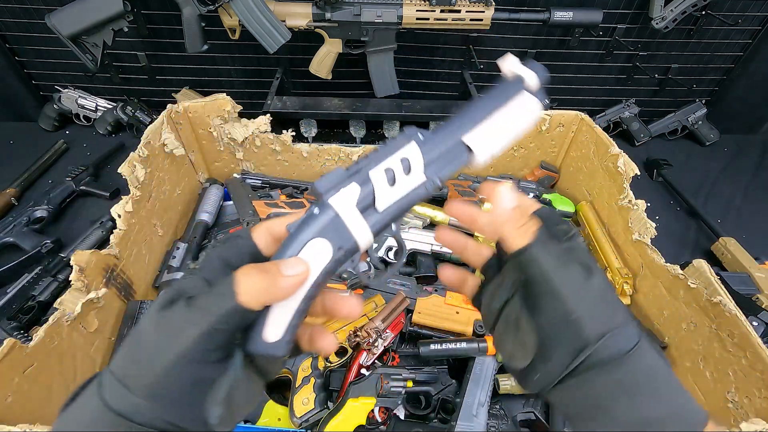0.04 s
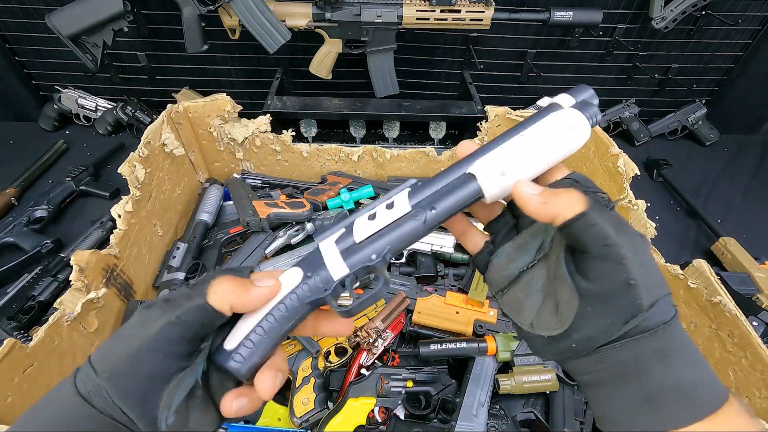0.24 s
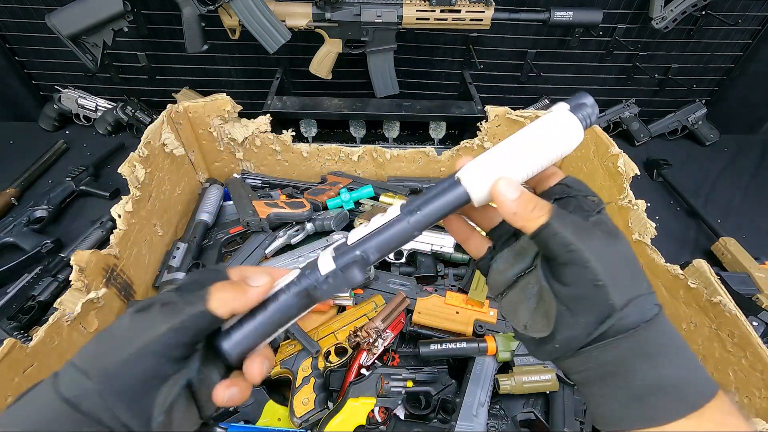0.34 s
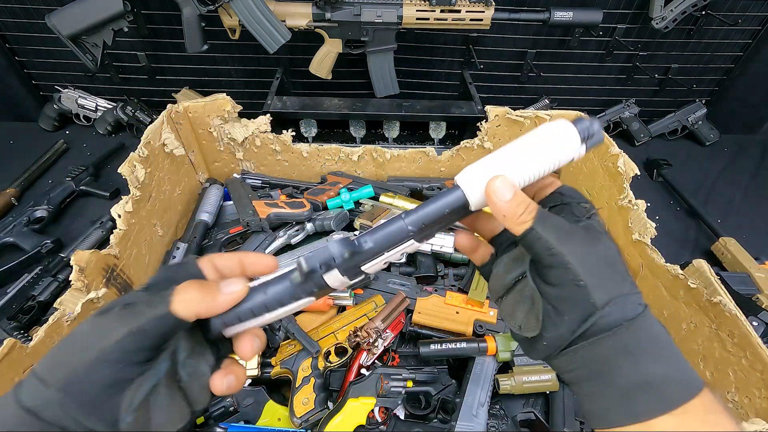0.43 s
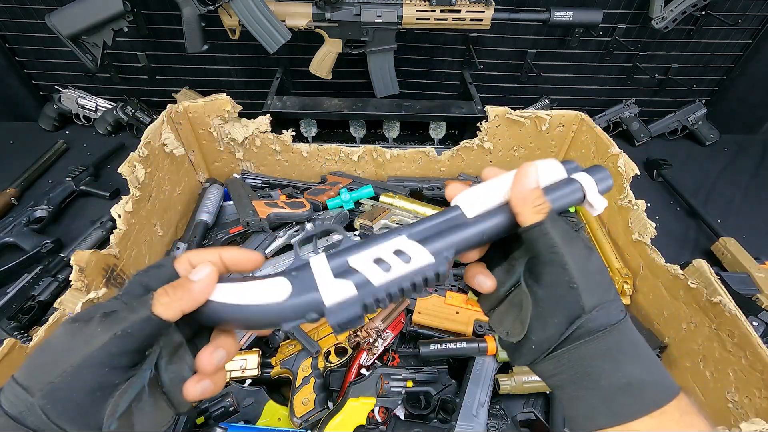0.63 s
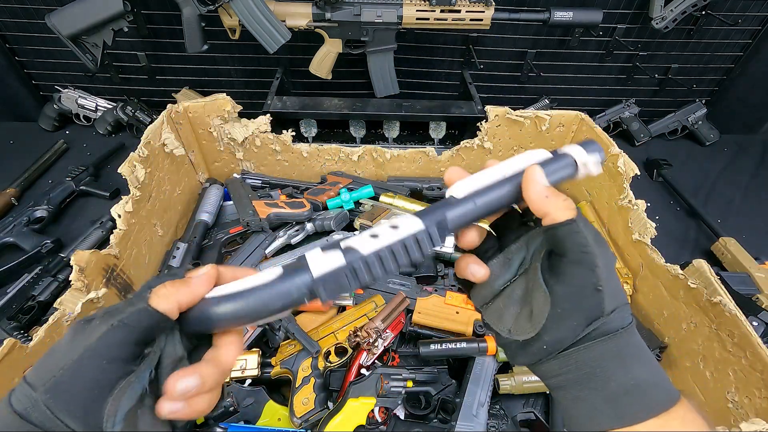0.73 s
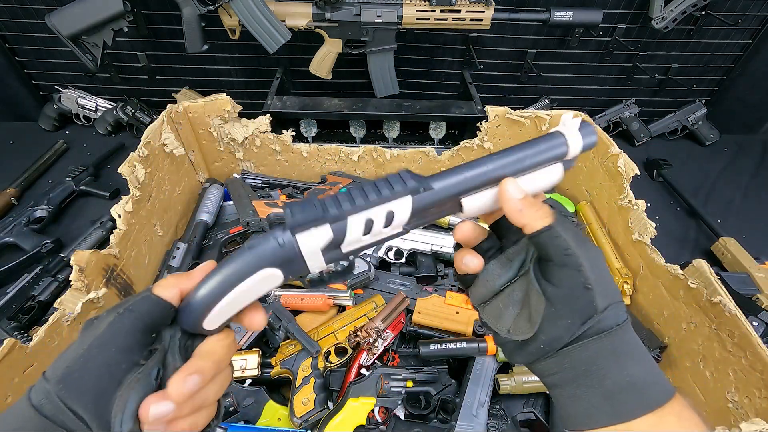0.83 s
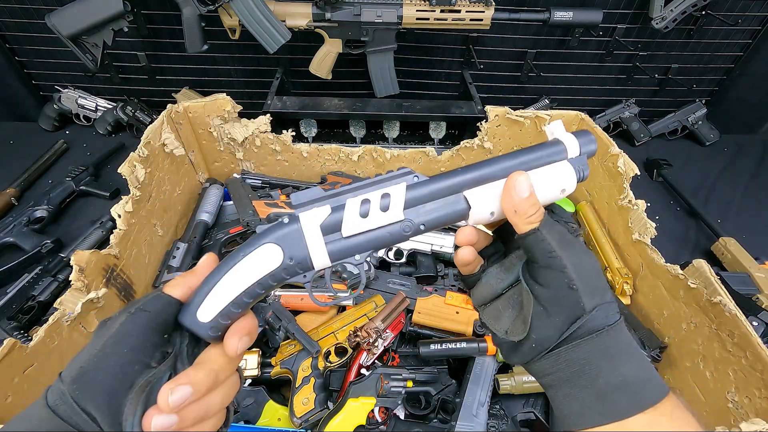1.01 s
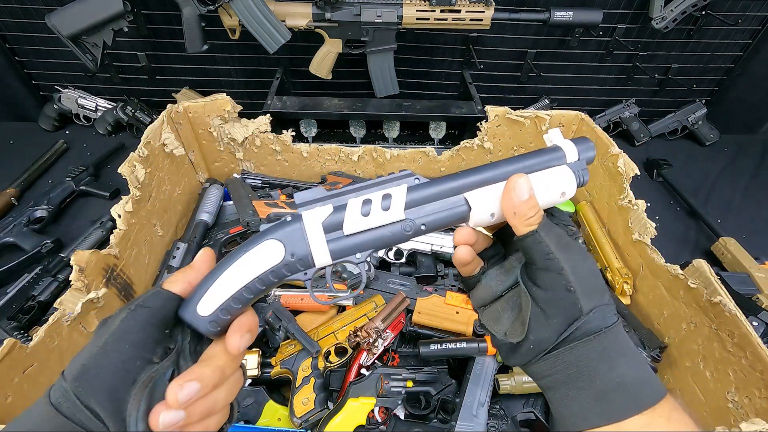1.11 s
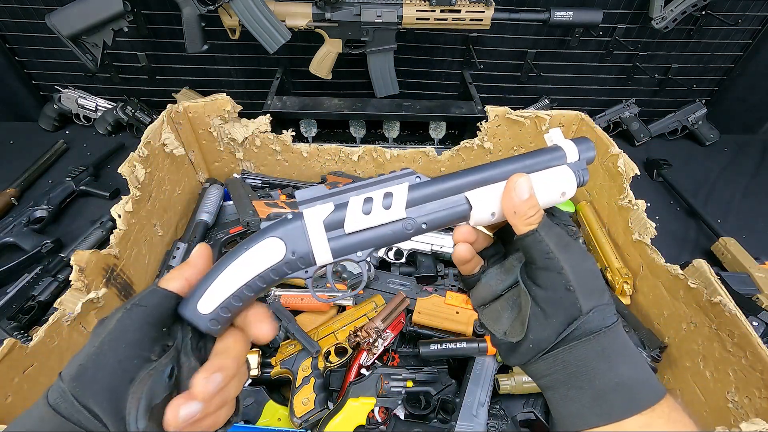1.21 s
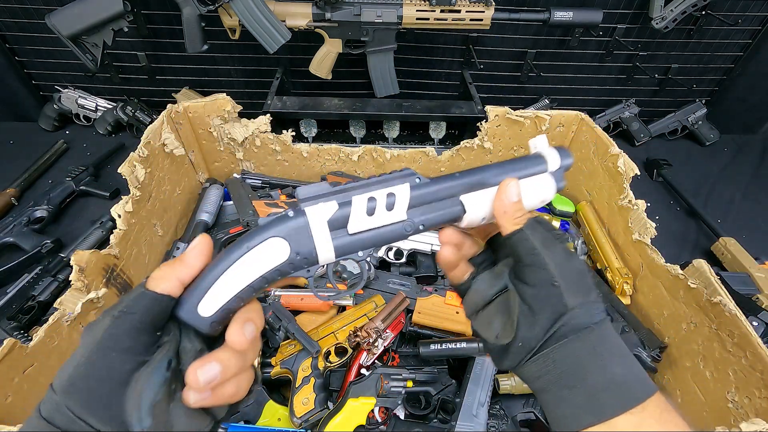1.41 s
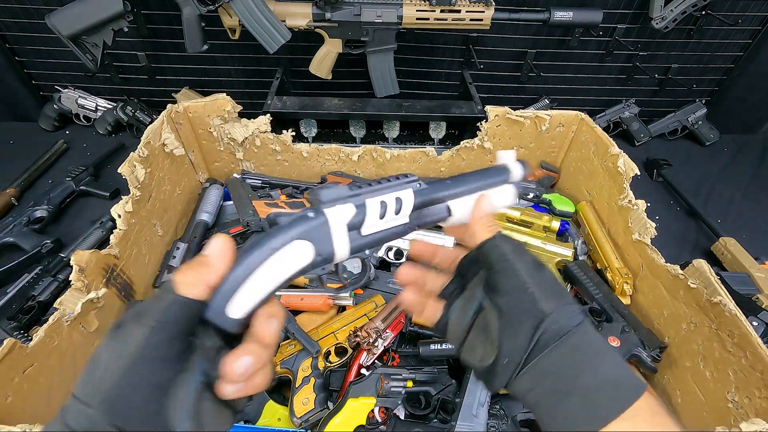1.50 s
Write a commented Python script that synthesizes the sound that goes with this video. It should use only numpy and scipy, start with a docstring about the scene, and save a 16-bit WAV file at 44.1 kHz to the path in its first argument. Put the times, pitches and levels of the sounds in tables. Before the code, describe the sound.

Sharp hollow clacks from a plastic toy shotgun being handled, with light scraping and rustling.

```python
"""Gloved hands turn a hollow plastic toy shotgun over and work its sliding grip, close up in a small room.
A faint rustle and a few ticks lead to the first hard clack at 0.22 s, with two lighter ones soon after.
Plastic scrapes on plastic and loose parts rattle against the shell; the mechanism hits its stops again
near 0.7 s and at 0.94 s. The handling then thins out to soft taps, scraping and glove rustle.
All along, the room answers with a short, slightly ringing tail over a low rumble."""
import sys
import numpy as np
from scipy import signal
from scipy.fft import rfft, irfft, next_fast_len
from scipy.io import wavfile

SR = 44100
rng = np.random.default_rng(int(sys.argv[2]) if len(sys.argv) > 2 else 0)


def master(y):
    """Save y as 16-bit WAV."""
    cut = np.clip(np.atleast_2d(y).T, -1, 1)
    pcm = np.round(cut * 32767)  # scale
    wavfile.write(sys.argv[1], SR, pcm.astype(np.int16))


N = 68355
BLOW_S = .004  # clack and tap levels count a hit's energy as spread over this time


def clacks(behind):
    """The mechanism hits its stops in quick bursts of contacts, heard from the front or from behind."""
    # Hard hits: t/s, level/dB, depth at 650 Hz/dB, brightness at 4 kHz/dB, extra level behind/dB,
    # rings of the struck part [(f/Hz, level/dB)]
    hits = [(0.2217, -27.5, 16, 1, 0, [(1100, 3.5), (1840, 0), (2320, -2)]),
            (0.2221, -22.5, 8, 6.5, -1, [(670, -8), (1150, -1.5), (2740, -5.5)]),
            (0.2254, -29.5, 11, 8, -3.5, [(1340, 4), (4150, -2), (6400, -10)]),
            (.3287, -29.5, -23, 0.5, -8, [(940, -3), (1650, -1), (3600, -4)]),
            (.3677, -35, 8, 4.5, -5.5, [(940, 2.5), (1420, -8.5), (1800, -3)]),
            (0.7047, -27, -4, 1, -8, [(2240, -2), (2890, -5), (4380, -1)]),
            (0.7073, -29.5, -10, 0, 3.5, [(915, -4), (1620, 0.5), (3680, -4)]),
            (.73, -27.5, -7, -3.5, 0.5, [(1360, -1), (1600, -1), (6300, -15)]),
            (0.9388, -28, 7, 13, -8.5, [(3790, 2.5), (4500, -1.5), (5450, -4)]),
            (.9389, -26, -9.5, -1, -4, [(925, -7.5), (1380, -4), (1930, -0.5)])]
    out = np.zeros(N)
    for s, db, depth_db, bright_db, back_db, rings in hits:
        add(out, s, amp(db + back_db * behind) * blow(depth_db, bright_db, rings))
    return out * np.sqrt(BLOW_S * SR)


def taps(ring_db=-3):
    """Loose parts tick against the shell as the toy turns."""
    # Light hits: t/s, level/dB, depth at 650 Hz/dB, brightness at 4 kHz/dB, ring of the part f/Hz
    hits = [(.041, -55.5, 1, -6, 2400), (.184, -50, -34, 11, 2280), (0.2185, -37, 1, -4, 1190),
            (.235, -35, 13, -7, 990), (0.2384, -49, 7, -13, 1130), (.244, -36, 6, -13, 980),
            (0.2943, -38, 4, -10, 1020), (0.369, -43, 0, -1, 2860), (0.3736, -41.5, -11, -9, 1375),
            (0.377, -48, -16.5, -1, 1700), (0.432, -46, -15, -19, 1370), (.447, -41, -2, -9, 1640),
            (.456, -43.5, -3, -13, 987), (0.5258, -49, 12, -22, 954), (0.564, -46.5, 4, -6, 1150),
            (.5686, -35.5, -7, -13, 1214), (0.5747, -42, -8, -18, 1380), (.588, -41, 3.5, -26, 1104),
            (.597, -38.5, -8, -12, 1315), (.633, -44.5, 8.5, -17, 1130), (.697, -46.5, 13.5, -19, 1390),
            (.8205, -48.5, 2, 0, 2330), (0.8631, -43, 5.5, -8.5, 1200), (.867, -45.5, -3, -18, 1100),
            (0.921, -52.5, 17, -25.5, 1200), (0.934, -42, -19.5, -0.5, 1280), (.97, -40.5, 3, 2, 1450),
            (1.129, -57, -4.5, 0, 1400), (1.135, -50, -20.5, -17, 1024), (1.3117, -61, -2, 9, 7200),
            (1.3234, -56, -4, 3, 1450), (1.4364, -48, -9, -15.5, 1890), (1.503, -46.5, -13, -9.5, 1720),
            (1.5082, -50.5, 3, -9, 1290)]
    out = np.zeros(N)
    for s, db, depth_db, bright_db, part_hz in hits:
        add(out, s, amp(db) * blow(depth_db, bright_db, [(part_hz, ring_db)]))
    return out * np.sqrt(BLOW_S * SR)


def blow(depth_db, bright_db, rings):
    """One contact: bright if hard, deep if heavy, with brief rings from the struck part on top."""
    t = np.arange(SR // 10) / SR
    tone = [(150, 0.0082), (380, depth_db), (650, depth_db), (950, 0), (1700, 0.0082),
            (4000, bright_db), (9000, 0.87 * bright_db)]
    body = norm(coloured(shell(), tone))
    low_cut = signal.butter(4, 760, "high", fs=SR, output="sos")  # small parts radiate almost no bass
    ringing = np.zeros(len(t))
    for hz, db in rings:
        t60 = .024 / (hz / 1000) ** .45  # higher rings die sooner
        ring = np.sin(2 * np.pi * hz * t) * amp(-60 * t / t60)
        part = amp(db) * norm(signal.sosfilt(low_cut, ring))
        ringing += np.sign(body @ part) * part  # in the polarity that reinforces the body
    return norm(body + ringing)


def shell(scatter_db=4.5, detune=.012, crack_db=4.5, crack_t60_s=0.026, snap_db=-11.5):
    """The struck shell: a snap, a crack and damped modes, excited a little differently each time."""
    # Modes of the hollow shell: f/Hz, level/dB, t60/s
    modes = [(667, -8.5, 0.007), (764, -11.5, 0.023), (961, -0.5, 0.024), (1135, -0.5, 0.038),
             (1408, -2.5, 0.063), (1535, -4.5, 0.0067), (1800, -2, 0.014), (2294, -3.5, 0.036),
             (2970, -7.5, 0.023), (3413, -5.5, 0.038), (4430, -11, 0.017), (5350, -16, 0.0076),
             (6380, -11.5, 0.025)]
    # Spectrum of the crack, a crowd of short-lived modes: f/Hz, level/dB
    crack_colour = [(100, -24), (450, -26.5), (850, -6), (1500, 0.5), (3000, -1.5), (4800, -5.5),
                    (7000, -13.5), (9000, -23), (12500, -27), (15000, -55)]
    # Bass roll-off of the small shell: f/Hz, level/dB
    radiation = [(120, -16.5), (480, -6.5), (630, -4.5)]
    t = np.arange(SR // 10) / SR
    hz, db, t60 = np.transpose(modes)[:, :, None]
    polarity = (-1) ** np.arange(len(modes))[:, None]
    size, shift = np.clip(rng.standard_normal((2, *hz.shape)), -1.5, 1.5)
    envelopes = amp(db + scatter_db * size - 60 * t / t60)
    ring = (polarity * envelopes * np.sin(2 * np.pi * hz * (1 + detune * shift) * t)).sum(0)
    burst = norm(rng.standard_normal(len(t)) * amp(-60 * t / crack_t60_s))
    snap = amp(snap_db) * (t == 0)
    crack = amp(crack_db) * norm(coloured(burst + snap, crack_colour))
    return norm(coloured(norm(ring) + crack, radiation))


def scrape(contact_points=30):
    """The sliding grip drives the shell with small slips; the resonances change as the contact moves."""
    # Envelope of plastic sliding on plastic: t/s, level/dB
    envelope = [(0, -62), (.11, -65.5), (.15, -75.5), (.2, -66.5), (.31, -53), (.36, -47.5), (.39, -65.5),
                (.46, -51), (.52, -68.5), (.59, -57), (.68, -57), (.77, -52), (.84, -64), (.89, -54),
                (1.02, -61), (1.27, -101), (1.34, -65), (1.41, -74), (1.55, -62)]
    drive = slips(per_s=2200, scatter_db=5)
    rub = np.zeros(N)
    for span in np.array_split(np.arange(N), contact_points):
        add(rub, span[0] / SR, signal.fftconvolve(drive[span], shell()))
    return level(envelope) * unit(coloured(rub, [(1500, 0.018), (4000, -1.5)]))


def gloves():
    """Fabric brushes the plastic in fine grains."""
    # Envelope of the rustle: t/s, level/dB
    envelope = [(0, -94), (.11, -66.5), (.16, -86), (.3, -58), (.35, -55.5), (.48, -72), (.52, -63),
                (.58, -60), (.65, -59.5), (.69, -64.5), (.85, -63.5), (.88, -47.5), (.92, -93),
                (1.1, -79.5), (1.21, -68), (1.25, -77.5), (1.305, -77), (1.32, -61.5), (1.45, -81),
                (1.55, -62)]
    # Spectrum of the fabric: f/Hz, level/dB
    cloth_colour = [(200, -50), (1200, 18.5), (3000, 4.5), (5000, 5.5), (7500, 4), (10000, -5.5),
                    (12500, -9.5), (15000, -89)]
    return level(envelope) * unit(coloured(slips(per_s=5000, scatter_db=3), cloth_colour))


def slips(per_s, scatter_db):
    """Friction as tiny, irregular stick-slip impulses."""
    slipping = rng.random(N) < per_s / SR
    direction, size = rng.standard_normal((2, N))
    return slipping * np.sign(direction) * amp(scatter_db * np.clip(size, -2, 2))


def near(x, pan_db=0.5, left_lag_s=.000011, box_db=-9.5, box_t60_s=0.022):
    """The toy sits slightly right; a cardboard box under the hands scatters some sound to the sides."""
    m = next_fast_len(N + SR // 10)
    delay = np.exp(-2j * np.pi * np.fft.rfftfreq(m, 1 / SR) * left_lag_s)
    left = irfft(rfft(x, m) * delay, m)[:N]
    t = np.arange(SR // 40) / SR
    box = norm(rng.standard_normal(len(t)) * amp(-60 * t / box_t60_s))
    side = amp(box_db) * signal.fftconvolve(x, box)[:N]
    return np.array([left * amp(-pan_db) + side, x * amp(pan_db) - side])


def reverb(x, positions=5):
    """As the toy moves, the room answers each position with a fresh tail."""
    out = np.zeros((2, N))
    for span in np.array_split(np.arange(N), positions):
        add(out, span[0] / SR, signal.fftconvolve(x[span][None], room_tail(), axes=1))
    return out


def room_tail(tail_db=-4.5, predelay_s=0.0021, rise_s=0.0019, linger_db=-23, linger_t60_s=0.18):
    """Dense stereo reflections that last longest in the bass, with a few faint room tones."""
    # Decay of the room: f/Hz, t60/s
    decay = [(300, 0.43), (1100, 0.26), (3000, 0.203), (8000, 0.26), (14000, 0.32)]
    # Colour of the tail: f/Hz, level/dB
    colour = [(300, 7), (1100, -4.2), (2500, -2), (5000, -3.5), (10000, -2)]
    # Tones that linger in the room: f/Hz, level/dB
    room_tones = [(632, 13), (698, -1), (760, 12.5), (951, 9), (1134, 10.5), (1190, -3), (1256, 5.5),
                  (1360, 2), (1400, 7), (1521, -1), (1562, -10)]
    hz, s, bands = signal.stft(rng.standard_normal((2, SR // 2)), SR, nperseg=256)
    band_db = along(colour, hz)[:, None] - 60 * s / along(decay, hz)[:, None]
    tail = signal.istft(bands * amp(band_db), SR, nperseg=256)[1]
    t = np.arange(tail.shape[1]) / SR
    rise = 1 - np.exp(-np.maximum(t - predelay_s, 0) / rise_s)
    tones = sum(amp(db) * np.sin(2 * np.pi * (f * t + rng.random())) for f, db in room_tones)
    ringing = norm(tones * rise * amp(-60 * t / linger_t60_s))
    return amp(tail_db) * spread(norm(tail * rise), width=0.57) + amp(linger_db) * ringing


def background(air_db=-61):
    """A deep rumble swells and sinks under the steady air of the room; both lean to the right."""
    # Spectrum of the rumble: f/Hz, level/dB
    rumble_colour = [(15, -19.5), (30, 2), (50, -10.5), (72, -23.5), (110, -26.5), (250, -84), (800, -73)]
    # Swell of the rumble: t/s, level/dB
    swell = [(0, -46.5), (.15, -48), (.38, -48), (.48, -53), (.75, -55), (.92, -52.5), (1.03, -63),
             (1.13, -50.5), (1.25, -65), (1.42, -61), (1.55, -51.5)]
    # Spectrum of the room's air: f/Hz, level/dB
    air_colour = [(40, 5.5), (100, -16), (150, 5), (230, 2.5), (330, -5.5), (550, -14), (1200, -24.5),
                  (3000, -46), (8000, -43), (12500, -60), (15000, -55)]
    rumble = level(swell) * noise_bed(rumble_colour, width=0.56)
    air = amp(air_db) * noise_bed(air_colour, width=0.6)
    return (rumble + air) * amp([[-.9], [.9]])


def noise_bed(colour, width):
    """Steady stereo noise of rms 1."""
    noise = coloured(rng.standard_normal((2, N + SR // 10)), colour)[:, -N:]
    return unit(spread(noise, width))


def amp(db):
    """Gain from dB."""
    return 10 ** (np.asarray(db) / 20)


def unit(x):
    """Scaled to rms 1."""
    return x / np.sqrt(np.mean(x ** 2) + 1e-20)


def norm(x):
    """Scaled to energy 1."""
    return x / np.sqrt(np.sum(x ** 2, axis=-1, keepdims=True) + 1e-20)


def level(points):
    """Gain per sample from (t/s, level/dB) points."""
    return amp(np.interp(np.arange(N) / SR, *np.transpose(points)))


def along(points, hz):
    """A curve through (f/Hz, value) points on a log frequency axis."""
    f, v = np.transpose(points)
    return np.interp(np.log(hz + 1), np.log(f + 1), v)


def coloured(x, points):
    """Minimum-phase EQ through (f/Hz, level/dB) points."""
    m = 2 * next_fast_len(x.shape[-1])
    gain = amp(along(points, np.fft.rfftfreq(m, 1 / SR)))
    cepstrum = irfft(np.log(gain), m)
    cepstrum[1:m // 2] *= 2  # folded forward in time, so nothing rings ahead of a hit
    cepstrum[m // 2 + 1:] = 0
    return irfft(rfft(x, m) * np.exp(rfft(cepstrum)), m)[..., :x.shape[-1]]


def spread(pair, width):
    """Left and right from a mid and a side signal."""
    mid, side = pair
    return np.array([mid + width * side, mid - width * side]) / np.sqrt(1 + width ** 2)


def add(track, s, sound):
    """Lay a sound into a track at s seconds."""
    start = max(0, round(s * SR))
    part = track[..., start:start + sound.shape[-1]]
    part += sound[..., :part.shape[-1]]


def scene():
    """The shell radiates a little differently to the front and to the back; the room answers both."""
    front, back = [clacks(behind) + taps() + scrape() + gloves() for behind in (False, True)]
    bed = background()
    return near(front) + (reverb(front) + reverb(back)) / np.sqrt(2) + bed


def record(dry):
    """A brick-wall low-pass takes off the very top of the treble."""
    top_hz = 14400
    m = next_fast_len(N + SR // 10)
    passband = np.fft.rfftfreq(m, 1 / SR) < top_hz
    return irfft(rfft(dry, m) * passband, m)[:, :N]


dry = scene()
out = record(dry)
master(out)
```